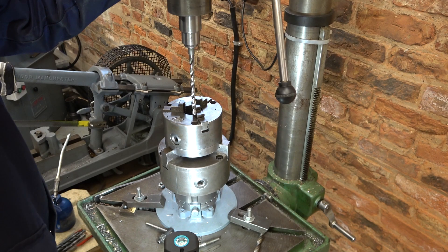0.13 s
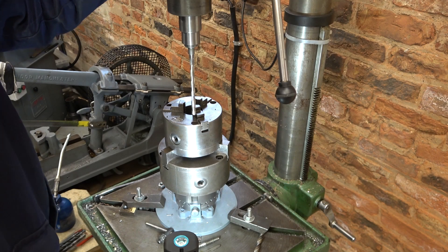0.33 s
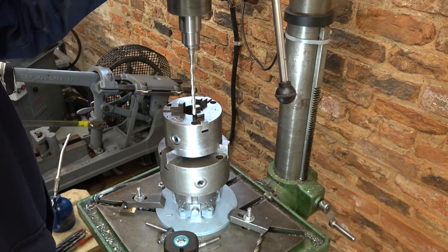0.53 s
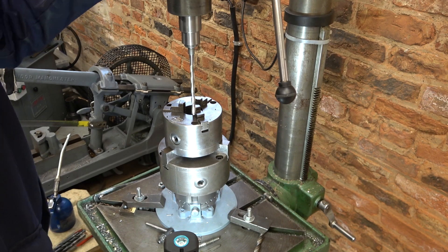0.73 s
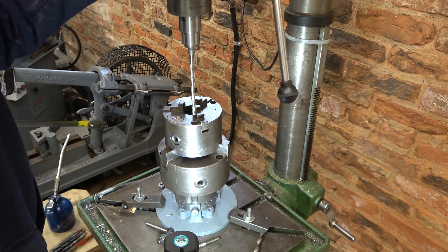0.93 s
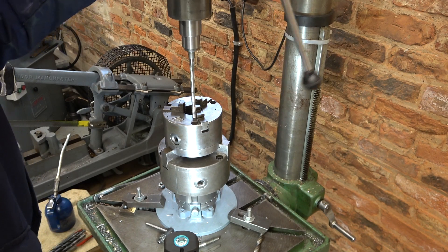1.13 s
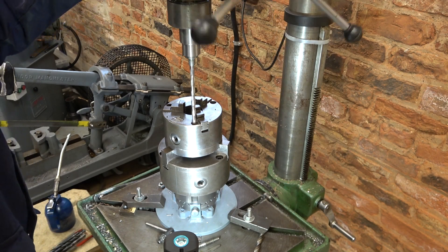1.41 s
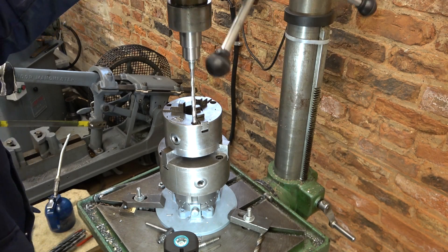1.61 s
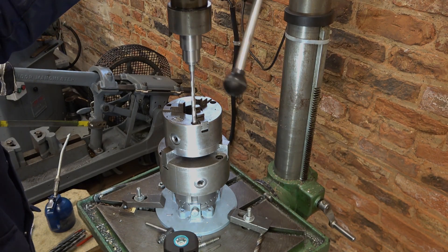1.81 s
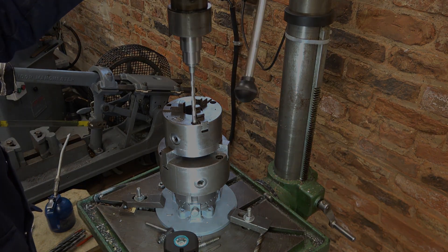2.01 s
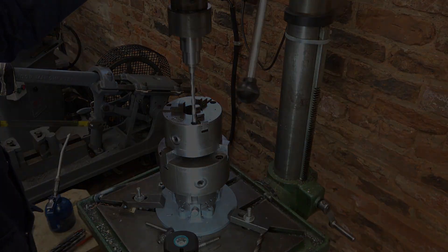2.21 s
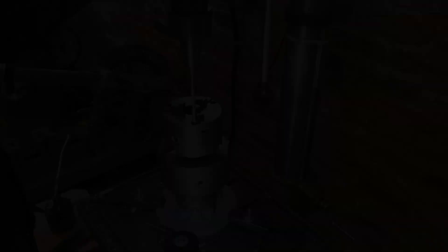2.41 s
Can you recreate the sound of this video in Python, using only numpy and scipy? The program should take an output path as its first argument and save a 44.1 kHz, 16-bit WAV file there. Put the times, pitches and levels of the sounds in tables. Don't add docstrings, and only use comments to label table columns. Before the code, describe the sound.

Close to a drilling machine, the switch clacks and the motor jumps into a buzzing hum with thumping belt and metallic rattle; the bit touches down, faint squeaks follow, and everything fades in a small hard-walled workshop.

```python
import sys
import numpy as np
from scipy import signal
from scipy.io import wavfile
from scipy.ndimage import uniform_filter1d

SR = 44100
rng = np.random.default_rng(int(sys.argv[2]) if len(sys.argv) > 2 else 0)


def magnitude_from_level(level_db):
    exponent = np.asarray(level_db, float) / 20
    return 10 ** exponent


def inscribe(sig):
    pcm = np.round(np.clip(np.atleast_2d(sig).T, -1, 1) * 32767)
    wavfile.write(sys.argv[1], SR, pcm.astype(np.int16))


N = 112454
t = np.arange(N) / SR

SHAFT_HZ = 25.03
ON_S = .222
BUMP_RISE_S = 0.00196


def band(x, hz, width):
    return signal.lfilter(*signal.iirpeak(min(hz, .45 * SR), hz / width, fs=SR), x)


def steep(x, hz, width):
    low_hz = max(np.sqrt(hz ** 2 + width ** 2 / 4) - width / 2, 5)
    edges = [low_hz, min(low_hz + width, .45 * SR)]
    return signal.sosfilt(signal.butter(3, edges, "bandpass", fs=SR, output="sos"), x)


def level(x, db):
    return x * magnitude_from_level(db) / np.sqrt(np.mean(x ** 2))


def walk(rate):
    k = int(SR / rate)
    steps = np.repeat(rng.standard_normal(N // 100)[:N // k + 1], k)
    smooth = uniform_filter1d(uniform_filter1d(steps, k), k)
    return level(smooth[:N], 0)


def coloured(table, flicker_db):
    hz, db = np.array(table).T
    out = 0
    for f in 25 * 2 ** np.arange(0, 9.4, 1 / 3):
        band_db = np.interp(np.log(f), np.log(hz), db) + flicker_db * walk(14)
        out = out + steep(rng.standard_normal(N), f, f / 4.3) * magnitude_from_level(band_db)
    return out


def decay(start, t60):
    return (t >= start) * magnitude_from_level(-60 * np.clip(t - start, 0, 1) / t60)


def burst(start, length):
    return np.sqrt(np.sin(np.pi * np.clip((t - start) / length, 0, 1)).clip(0))


def crack(start, db, hz, width, t60):
    noise = level(steep(rng.standard_normal(SR // 2), hz, width), 0)
    rise = np.sin(np.pi / 2 * np.clip((t - start) / (.001 + 1.3 / hz), 0, 1)) ** 2
    return magnitude_from_level(db) * decay(start, t60) * rise * np.resize(noise, N)


def ring(start, db, hz, t60):
    since = t - start
    partner_hz = hz * (1 + .12 * rng.standard_normal())
    pair = np.sin(2 * np.pi * hz * since) + 0.49 * np.sin(2 * np.pi * partner_hz * since)
    return magnitude_from_level(db) * decay(start, t60) * np.clip(since / max(BUMP_RISE_S, 1 / hz), 0, 1) * pair


def rattle(modes, pulse_db):
    hits_per_s, scatter_db, repeat = 2500, 2.5, .3
    chance = rng.random((3, N))
    size_db = scatter_db * np.minimum(-np.log(chance[1] + 1e-9), 4)
    hits = (chance[0] < hits_per_s / SR) * magnitude_from_level(size_db) * np.sign(chance[2] - .5)
    turn = np.zeros(int(SR / SHAFT_HZ) + 1)
    turn[0], turn[-1] = 1, -repeat
    hits = signal.lfilter([1], turn, hits) * magnitude_from_level(pulse_db + .6 * walk(12))
    out = 0
    for hz, width, db in modes:
        out = out + magnitude_from_level(db) * band(band(hits, hz, width), hz, 2.36 * width) / np.sqrt(width)
    return level(out, 0)


def workshop_air():
    # f/Hz, level/dB
    room = [(15, -31), (25, -5), (59, -3.5), (373, -18), (2110, -28), (3340, -31), (3720, -33.5),
            (16000, -39.5)]
    return level(coloured(room, 1.3)[::-1], -56)


def knocks():
    # t/s, f/Hz, width/Hz, level/dB, t60/s
    thumps = [(0.2, 1000, 1300, -31.5, 0.1), (.228, 1200, 590, -30.5, 0.07), (.225, 2000, 660, -46.5, 1),
              (0.24, 90, 60, -36, 0.98), (.21, 500, 300, -36, 0.093), (.25, 1250, 300, -31, 0.062),
              (.27, 2200, 380, -43, .2), (.232, 380, 170, -27.5, 0.48), (.295, 18000, 4800, -59.5, .5),
              (.416, 1020, 460, -29, 0.07), (0.78, 700, 500, -30.5, 0.17), (1.795, 4300, 1500, -52, 0.1),
              (1.81, 1670, 300, -32, 0.08), (0.065, 84, 67, -51.5, 0.64), (1.801, 1640, 370, -35, 0.15),
              (1.797, 2520, 500, -43.5, 0.16), (1.8, 794, 130, -35, 0.11)]
    return sum(crack(s, db, hz, width, t60) for s, hz, width, db, t60 in thumps)


def snaps_and_ticks():
    # t/s, peak level/dB, centre f/Hz, width/Hz, t60/s
    snaps = [(0.0803, -47.5, 3700, 4040, 0.025), (0.1072, -43.5, 3700, 4000, 0.02),
             (.172, -51, 4100, 1960, 0.058), (0.191, -47.5, 7000, 8740, 0.079),
             (0.2012, -22, 5200, 10000, 0.028), (0.223, -38.5, 3000, 3000, 0.073),
             (0.2875, -29, 7500, 8000, 0.078), (0.289, -28.5, 6500, 1530, 0.052),
             (0.366, -20, 5200, 10400, 0.017), (0.4995, -35, 3970, 3000, 0.024),
             (0.8957, -38.5, 4740, 3000, 0.054), (1.055, -43, 6000, 8000, 0.045),
             (1.592, -42.5, 4540, 2500, 0.04), (1.799, -37.5, 7900, 6000, 0.052),
             (1.848, -38, 8500, 6000, 0.032)]
    # f/Hz, level/dB, t60/s
    box = [(2400, -12, 0.067), (4326, 9, 0.06), (5170, -3, 0.071), (6970, -2, 0.07), (7560, -12, 0.095),
           (7700, 3, 0.043), (8760, -0.5, 0.053), (8700, 4, 0.025), (9600, 8.5, 0.034),
           (10700, -14.5, 0.046)]
    out = sum(crack(s, db - 8, hz, width, t60) for s, db, hz, width, t60 in snaps)
    snap_s, snap_db = snaps[4][:2]
    return out + sum(crack(snap_s, snap_db + db - 20, hz, 350., t60) for hz, db, t60 in box)


def motor_hum(turns):
    tones = [(2, -40), (3, -38), (4, -21), (5, -30), (6, -20), (7, -7), (8, -14), (9, -5), (10, -1),
             (11, -7), (12, -3), (13, -6), (14, -8), (15, -12), (16, -11), (17, -16), (18, -20), (19, -22),
             (20, -13), (21, -15), (22, -18), (23, -19), (24, -20)]
    feed_change = dict([(10, -3), (11, -4), (12, 5.5), (13, -4.5), (14, -1)])
    feed_s, feed_end_s = 1.0, 1.68
    fed = uniform_filter1d(1. * (t > feed_s) * (t < feed_end_s), size=SR // 8) - .5
    out = 0
    for k, db in tones:
        tone_db = db + feed_change.get(k, 0) * fed + 1.1 * walk(7)
        cycles = k * turns + k * k / 9.5 + .15 * rng.random()
        out = out + magnitude_from_level(tone_db) * np.sin(2 * np.pi * cycles + .35 * walk(8))
    return out


def belt_rumble(beat):
    # f/Hz, level per Hz/dB
    colour = [(25, -56.5), (130, -24), (200, -11), (290, -2.5), (480, -17.5), (1250, -22), (1400, -31),
              (2600, -51.5)]
    noise = coloured(colour, .8)
    return signal.lfilter(*signal.butter(4, colour[-1][0], fs=SR), noise) * magnitude_from_level(1.2 * beat)


def motor_fan():
    # f/Hz, level per Hz/dB
    colour = [(1500, -6.5), (2600, 2.5), (5500, -3), (7500, -8), (11000, -17), (16000, -23)]
    return signal.lfilter(*signal.butter(4, colour[0][0], "high", fs=SR), coloured(colour, 0.98))


def loose_parts(beat):
    # f/Hz, width/Hz, level/dB
    head = [(392, 74, -3), (531.3, 43, -0.5), (810.6, 101, -1.5), (948.3, 62, -1), (1076, 38, -6),
            (1230.5, 51, -4.5), (1613, 32, -15.5), (1873, 140, -13.5), (2030, 28, -33.5)]
    # f/Hz, width/Hz, level/dB
    chuck = [(3020, 88, 0), (3700, 300, 2.5), (4285, 57, 0), (5140, 120, -9), (5600, 220, -1),
             (6400, 260, -3.5)]
    return magnitude_from_level(-8) * rattle(head, 0.5 * beat) + magnitude_from_level(-35) * rattle(chuck, 3.5 * beat)


def machine():
    # t/s, running level/dB, rattle level/dB
    run = [(.222, -23.5, 8), (.25, -24, -0.5), (.348, -26, 0.5), (.39, -21, -7), (.52, -25, -0.5),
           (.7, -23, -7), (.86, -23.5, -8), (.92, -23.5, -4.5), (1.1, -23.5, -1.5), (1.3, -24.5, -2),
           (1.5, -25.5, 0.5), (1.66, -24.5, -2), (1.76, -27, 1.5), (1.79, -25, 4), (1.9, -24, -3)]
    spin_up_s, start_speed = .15, .55
    speed = np.clip(start_speed + (1 - start_speed) * (t - ON_S) / spin_up_s, start_speed, 1)
    turns = np.cumsum(SHAFT_HZ * speed * (1 + .001 * walk(3))) / SR
    beat = np.cos(2 * np.pi * turns) + 0.24 * np.cos(np.pi * turns)
    s, run_db, rattle_db = np.array(run).T
    body = level(motor_hum(turns), 0) * speed ** 4.4
    body += level(belt_rumble(beat), -5)
    body += level(motor_fan(), -32.5)
    body += loose_parts(beat) * magnitude_from_level(np.interp(t, s, rattle_db))
    return body * magnitude_from_level(np.interp(t, s, run_db)) * np.clip((t - ON_S) / 0.0066, 0, 1)


def cover_bumps():
    # t/s, peak level/dB, f/Hz
    bumps = [(0.229, -19, 923), (0.281, -19, 1008), (0.382, -24, 852), (0.416, -14.5, 950),
             (0.493, -21, 958), (0.635, -20, 996), (0.702, -25.5, 953), (0.866, -28, 944),
             (0.894, -23, 1246), (0.943, -25.5, 1227), (0.979, -26, 972), (1.014, -24, 903),
             (1.054, -18.5, 1264), (1.189, -24.5, 1255), (1.23, -19.5, 1275), (1.3, -29, 1042),
             (1.341, -24.5, 967), (1.422, -23.5, 966), (1.467, -21, 1246), (1.521, -23.5, 1000),
             (1.589, -22, 950), (1.621, -19, 1103), (1.704, -25.5, 994), (1.797, -21, 956),
             (1.902, -26.5, 970), (2.146, -33, 890)]
    return sum(ring(s - BUMP_RISE_S, db - 4, hz, 0.082) for s, db, hz in bumps)


def belt_slip():
    # t/s, length/s, f/Hz, level/dB
    whistles = [(.269, .006, 7570, -46), (.312, .008, 11400, -54), (.332, .03, 8250, -51),
                (.326, .035, 9600, -56), (.424, .021, 8250, -58)]
    out = sum(magnitude_from_level(db) * burst(s, length) * np.sin(2 * np.pi * hz * t) for s, length, hz, db in whistles)
    hiss_s, hiss_end_s = 0.24, .41
    hiss = level(steep(rng.standard_normal(N), 6500, 8000.), -53.5)
    return out + burst(hiss_s, hiss_end_s - hiss_s) * hiss


def seam_jolts():
    # t/s, peak level/dB, f/Hz
    jolts = [(0.319, -17, 261), (0.383, -11.5, 256.4), (0.424, -12, 253), (0.589, -17.5, 256),
             (0.724, -13.5, 255), (0.763, -11, 257), (0.828, -13, 245), (0.988, -12.5, 301),
             (1.242, -12, 307), (1.503, -16, 294), (1.54, -14, 251), (1.7, -15, 264), (1.78, -14, 258),
             (1.949, -16, 244)]
    return sum(ring(s - BUMP_RISE_S, db - 6.5, hz, 0.094) for s, db, hz in jolts)


def jaw_ticks():
    # t/s, peak level/dB, f/Hz
    jaw = [(0.6572, -44.5, 5630), (0.7001, -51, 5770), (0.741, -50, 5190), (0.776, -47, 5170),
           (0.8069, -51, 5490), (0.8962, -47, 5530), (0.9356, -45, 5540), (0.975, -48.5, 5600),
           (1.0159, -47.5, 5370), (1.0553, -42.5, 5200), (1.0957, -41.5, 5450), (1.1761, -43, 5270),
           (1.215, -40.5, 5560), (1.2554, -46.5, 5600), (1.2938, -51.5, 5600), (1.3207, -52, 5450),
           (1.416, -51, 5100), (1.4554, -46.5, 5600), (1.4958, -47.5, 6130), (1.5816, -49, 5100),
           (1.7004, -50, 5630)]
    return sum(crack(s, db - 4.5, hz, 500, 0.038) for s, db, hz in jaw)


def touch_down():
    # f/Hz, level/dB, t60/s
    quill = [(3230, -48, .12), (3560, -49, 0.085), (4330, -45, .05), (5100, -50, 0.058), (5900, -47, .05),
             (8500, -46.5, .03), (9300, -50.5, .03), (6400, -49, .05)]
    return sum(crack(1.0553, db, hz, 300., t60) for hz, db, t60 in quill)


def spindle_squeaks():
    # t/s, peak level/dB
    squeaks = [(1.788, -43), (1.8227, -47), (1.8487, -60), (1.8945, -42.5), (1.98, -42.5), (2.0548, -48),
               (2.1285, -52), (2.2068, -50.5), (2.2822, -55), (2.365, -61)]
    squeak_hz, width_hz, length_s = 10600, 350, 0.018
    rough = band(steep(rng.standard_normal(N), squeak_hz, 1200.), squeak_hz, width_hz)
    rough = level(rough * magnitude_from_level(2.5 * walk(250)), -14.5)
    return rough * sum(magnitude_from_level(db) * burst(s - .003, length_s) for s, db in squeaks)


def brick_walls(near):
    tail = steep(rng.standard_normal(N), 2305.0, 8000.0) * decay(0.0091, 0.19)
    tail = tail[:SR // 2]
    return signal.fftconvolve(near, tail / np.sqrt(np.sum(tail ** 2)))[:N] * magnitude_from_level(-14.5)


def scene():
    # t/s, fade level/dB
    fade_out = [(1.6, 0.5), (1.9, -2.5), (2.15, -8), (2.33, -14), (2.42, -22.5), (2.46, -37), (2.47, -110)]
    fade = magnitude_from_level(np.interp(t, *np.array(fade_out).T))
    near = knocks() + snaps_and_ticks() + machine() * fade + cover_bumps() + belt_slip()
    near += seam_jolts() + jaw_ticks() + touch_down() + spindle_squeaks()
    mono = near + brick_walls(near) + workshop_air() * fade
    low = signal.filtfilt(*signal.butter(2, [130, 400], "bandpass", fs=SR), mono)
    hiss = level(steep(rng.standard_normal(N), 12000., 7000.), -89) * fade
    side = -magnitude_from_level(-39) * low + hiss
    return (mono + side * np.array([[1], [-1]])) * (t < fade_out[-1][0])


def roll_off(x):
    return signal.sosfilt(signal.butter(12, 16440, fs=SR, output="sos"), x)


def record(dry):
    top_cut = signal.ellip(8, .2, 70, 15800, fs=SR, output="sos")
    mix = signal.sosfilt(top_cut, dry)
    return roll_off(mix)


dry = scene()
out = record(dry)
inscribe(out)
```